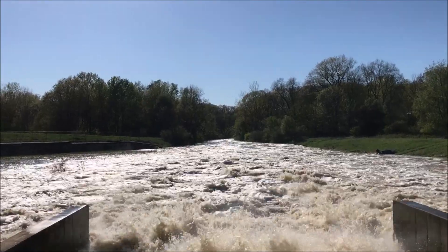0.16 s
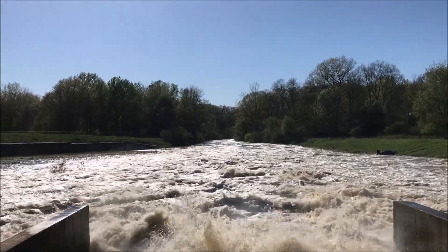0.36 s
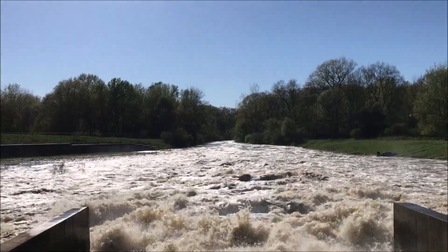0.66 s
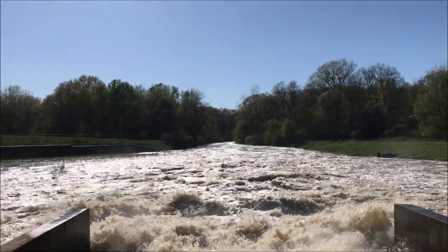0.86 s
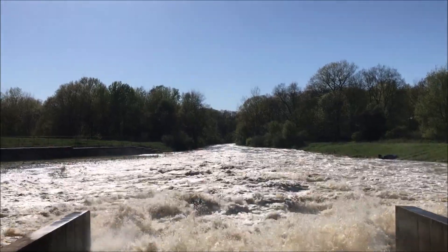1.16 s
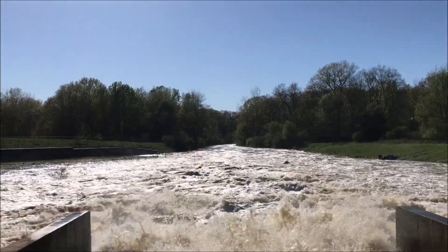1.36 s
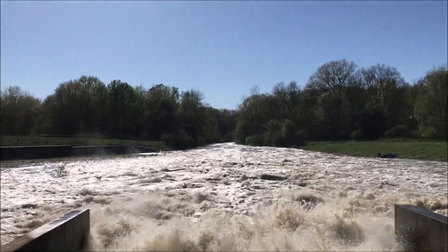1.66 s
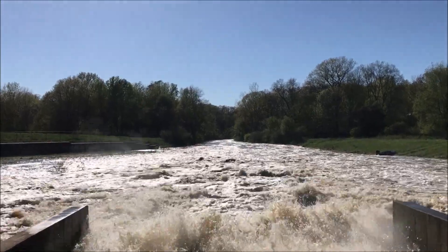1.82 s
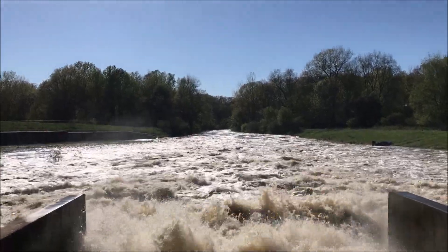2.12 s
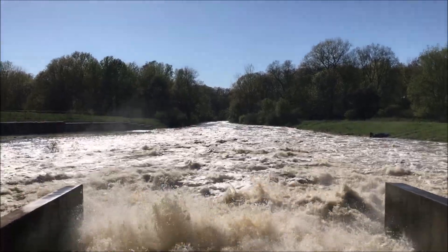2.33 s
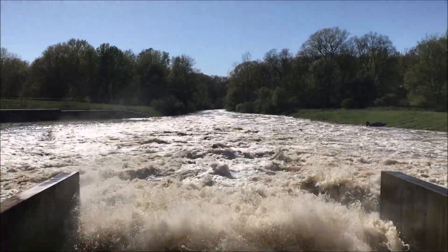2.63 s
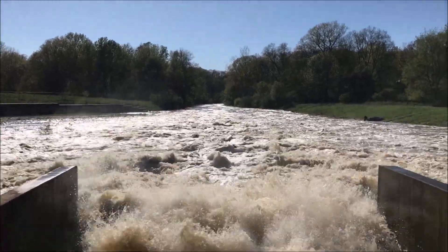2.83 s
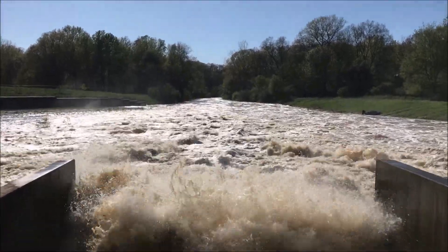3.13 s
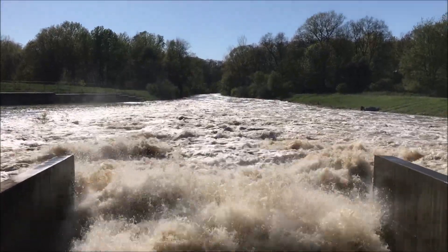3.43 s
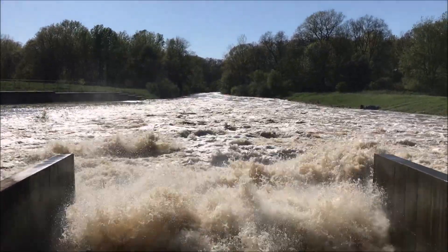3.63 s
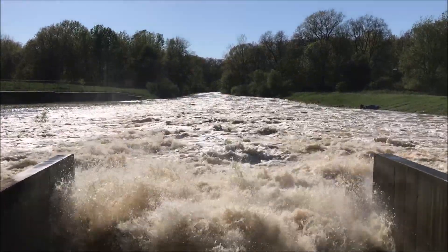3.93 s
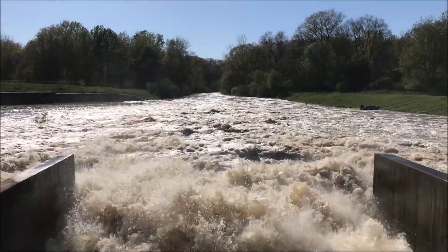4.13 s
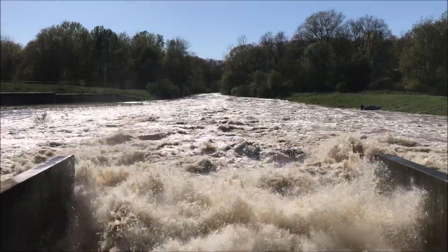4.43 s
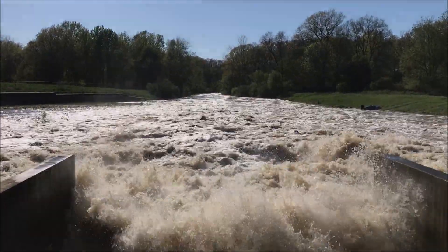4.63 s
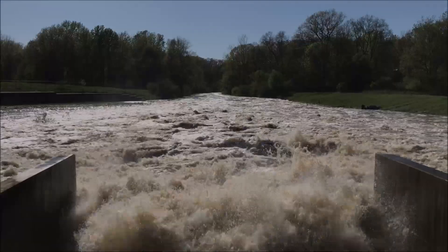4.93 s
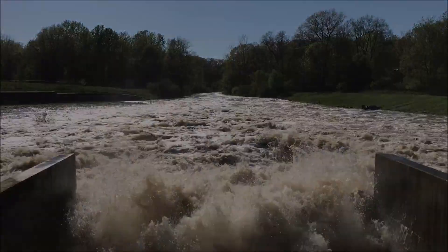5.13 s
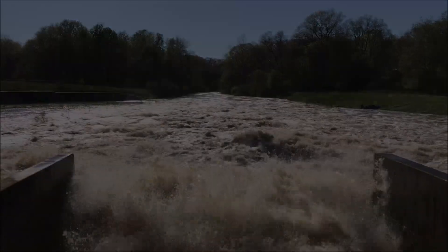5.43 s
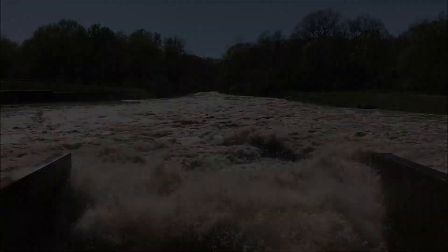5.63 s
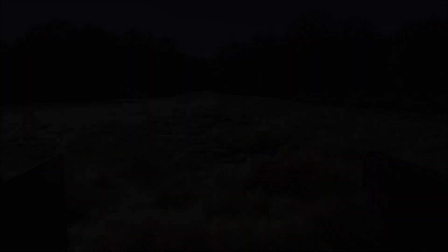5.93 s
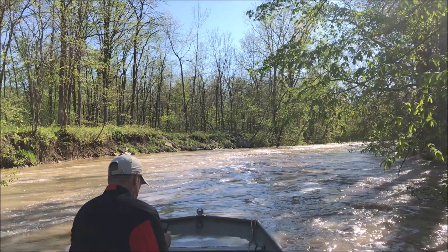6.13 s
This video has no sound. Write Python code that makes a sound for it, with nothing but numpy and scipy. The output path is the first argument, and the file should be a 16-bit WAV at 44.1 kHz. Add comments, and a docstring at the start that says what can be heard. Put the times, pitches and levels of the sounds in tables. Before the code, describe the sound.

Floodwater pours through a dam gate outdoors, heard fairly close from above in mono. A dense roar starts at full strength: deep rumble, boiling mid-low churn, broad froth and fine spray hiss, flickering unevenly. Low thuds of plunging water and a few quick wet slaps break through. From about one second the whole roar fades evenly to silence near six seconds, followed by a barely perceptible low river murmur.

```python
"""Floodwater from a dam gate

Floodwater plunges out of a dam gate between two walls and churns into white water, heard from above.
Trapped air rumbles, large bubbles boil, small ones froth and spray hisses: random clicks shaped by tone tables.
Heavy plunges and slaps of water add short, ringing tones from shut-in air.
The white water fades in small steps to silence, then a quiet river (clicks again) with a hum of steady tones
begins to fade in."""
import sys
import numpy as np
from scipy import signal
from scipy.fft import rfft, irfft
from scipy.io import wavfile

SR = 44100
rng = np.random.default_rng(int(sys.argv[2]) if len(sys.argv) > 2 else 0)


def log_audio(samples):
    """Write samples as a 16-bit WAV file to the path given in sys.argv[1]."""
    # one column per channel
    frames = np.atleast_2d(samples).T
    # limit to full scale, then quantise
    limited = np.clip(frames, -1, 1)
    pcm = np.round(limited * 32767).astype(np.int16)
    wavfile.write(sys.argv[1], SR, pcm)


N = 276507  # length [samples]

# Tone of each layer; only the shape counts, as each layer is brought to one loudness afterwards.
# Clouds of trapped air: (frequency [Hz], relative level [dB])
RUMBLE_TONE = [(13, -52), (22, -22), (33, -14), (44, -0.5), (64, 3), (104, -0.5), (145, -6), (200, -13.5),
               (260, -43.5), (440, -120)]
# Large bubbles: (frequency [Hz], relative level [dB])
BOIL_TONE = [(82, -29.5), (140, -3.5), (200, -2.5), (274, -2), (390, -4.5), (505, -8), (560, -11.5),
             (620, -17.5), (900, -59), (1500, -120)]
# Small bubbles: (frequency [Hz], relative level [dB])
FROTH_TONE = [(200, -69), (380, -31), (540, -9), (600, -4), (680, -2), (794, -4), (1250, -2), (1700, -4),
              (2050, -7.5), (2300, -14.5), (2600, -21), (3380, -42.5), (5720, -120)]
# Droplets, with the dips of the microphone housing: (frequency [Hz], relative level [dB])
SPRAY_TONE = [(1400, -27), (2400, -10), (2620, -4), (3090, 0.5), (3820, -2), (4440, 1), (5000, -4.5),
              (5900, -4.5), (7600, -15), (8300, -14.5), (9500, -16.5), (10500, -24.5), (11300, -24),
              (13300, -29), (16500, -28)]
# Surges about the steady levels: (time [s], rumble level [dB], boil level [dB], froth level [dB])
SURGES = [(0.0, 0.5, -2.5, 0.3), (0.2, -1.5, -1, 0), (0.33, -1, -1.5, 1), (0.44, -4, -1, 0),
          (0.52, 1, 3, 1.3), (0.62, -2.5, .5, -0.9), (0.75, -1, -2, 0.5), (0.95, 0, 0, .2), (1.1, 0, 0, 0),
          (1.27, -1, 2, 0), (1.4, -1.5, -2.5, -0.9), (1.47, -1, -0.5, 0), (1.5, -7, -2, -0.5),
          (1.55, -7, -3, 0), (1.58, 0, 1.5, 1), (1.63, 1, 1.5, -0.5), (1.68, -2, 1.5, .5),
          (1.8, -0.5, -2, -1), (1.95, -1, -1, -0.5), (2.06, -3, -0.5, 0.5), (2.2, 1.5, 0, -0.5),
          (2.35, 0, 0, 0.2), (2.65, -2.5, 1, 1), (2.8, -0.5, -3, 0), (2.92, -1, 0, -1), (3.08, -1, 0, -0.5),
          (3.3, -0.5, 0, 0), (3.43, -3.5, 1.5, 0), (3.6, -0.5, -1.5, 1.2), (3.85, -1, 2, -0.5),
          (4.02, 0, 1.5, 1), (4.11, 1.5, 0, -2), (4.2, -0.5, 1.5, 1), (4.3, -0.5, -1, -0.5),
          (4.5, 2, -1.5, -0.1), (4.65, -4, -0.5, 0.5), (4.8, 0.5, 1.5, 1), (4.95, 1, 0, 0),
          (5.2, 0, 1.5, 0), (5.5, -2, -1.5, -0.5), (5.72, 1, 2, 1.5), (5.86, 0, 2, 0.5), (6.0, 1, 0, 3.5)]
RUMBLE_DB, BOIL_DB, FROTH_DB, SPRAY_DB = -20.5, -23.5, -18.0, -28.5  # steady levels before the fade
SPRAY_FOLLOWS = 0.7  # share of the froth's surges [dB per dB] that the spray follows


def white_water():
    """Air clouds and bubbles of all sizes collapse; rumble and boil surge alone, froth and spray together."""
    rumble_surge_db, boil_surge_db, froth_surge_db = in_time(SURGES)
    rumble = churn(RUMBLE_TONE, 300, size_spread_db=2.0, heave_db=-0.1, patchy_db=0.16, patch_hz=7.1)
    boil = churn(BOIL_TONE, 1000, size_spread_db=2.2, heave_db=0.5, patchy_db=1.2, patch_hz=5.0)
    froth = churn(FROTH_TONE, 3000, size_spread_db=2.2, heave_db=0.5, patchy_db=1.0, patch_hz=5.0)
    spray = churn(SPRAY_TONE, 12000, size_spread_db=2, heave_db=0.4, patchy_db=0.5, patch_hz=12.0)

    water = from_db(RUMBLE_DB + rumble_surge_db) * rumble
    water += from_db(BOIL_DB + boil_surge_db) * boil
    water += from_db(FROTH_DB + froth_surge_db) * froth
    water += from_db(SPRAY_DB + SPRAY_FOLLOWS * froth_surge_db) * spray
    return water


def churn(tone, per_s, size_spread_db, heave_db, patchy_db, patch_hz):
    """Families of collapses ring a third of an octave apart; they heave together and flicker alone."""
    hz = np.maximum(np.fft.rfftfreq(N, 1 / SR), 1)
    tone_hz, tone_db = np.array(tone).T
    colour = from_db(np.interp(np.log(hz), np.log(tone_hz), tone_db))

    # pitch counted in thirds of an octave
    thirds = 3 * np.log2(hz)
    lowest = int(3 * np.log2(tone_hz[0]))
    highest = int(3 * np.log2(tone_hz[-1])) + 1

    heave = drift(14.0)
    out = np.zeros(N)
    for band in range(lowest, highest + 1):
        # neighbouring bands add up to even power
        share = np.cos(np.pi / 2 * np.clip(thirds - band, -1, 1))
        clicks = bursts(per_s, size_spread_db)
        family = irfft(rfft(clicks) * share * colour, N)
        flicker = drift(patch_hz)
        out += from_db(heave_db * heave + patchy_db * flicker) * family
    return rms_one(out)


def bursts(per_s, size_spread_db):
    """Each collapse is one click at a random moment, of random size and sign."""
    size_db = size_spread_db * np.minimum(rng.exponential(1, N), 5)
    clicks = from_db(size_db) * rng.choice([-1, 1], N)
    happens = rng.random(N) < per_s / SR
    return rms_one(clicks * happens)


def drift(corner_hz):
    """Slow random wandering of spread 1: noise smoothed twice by the same low-pass."""
    step = 40  # samples between the coarse points
    warm_up = 2000  # coarse points thrown away while the filter settles
    r = np.exp(-2 * np.pi * corner_hz * step / SR)
    noise = rng.standard_normal(N // step + warm_up + 2)
    slow = signal.lfilter([1], [1, -2 * r, r * r], noise)[warm_up:]
    return np.interp(np.arange(N) / step, np.arange(len(slow)), rms_one(slow))


FADE_END_S, FADE_LENGTH_S = 6.042, 4.91  # straight fall of the gain to zero
FADE_STEPS_PER_S = 30


def fade_out():
    """Gain of the white water: full at first, then a straight fall held in short steps."""
    step_s = np.floor(np.arange(N) / SR * FADE_STEPS_PER_S) / FADE_STEPS_PER_S
    return np.clip((FADE_END_S - step_s) / FADE_LENGTH_S, 0, 1)


# Heavy plunges of water: (time [s], level before rise and decay [dB], pitch [Hz])
HEAVY_PLUNGES = [(0.149, -4.5, 120.5), (0.05, -10, 60), (0.18, -4, 52), (0.5, -6, 60), (0.88, -5, 60),
                 (0.572, -4, 106), (1.12, -12, 75), (1.24, -9, 185.5), (1.255, -11, 75.5), (1.5, -5, 99),
                 (1.603, -2.5, 110), (1.61, -8.5, 169), (1.688, -6, 85), (1.81, -6, 60), (1.98, -4, 80),
                 (2.139, -5, 57), (2.416, -12, 75.4), (2.57, -8.5, 165), (2.76, -10.5, 100),
                 (2.82, -10, 60), (2.95, -8, 65), (3.19, -11, 110), (3.13, -14, 80), (3.27, -14, 85),
                 (3.33, -7, 65), (3.61, -7, 87), (3.72, -13, 70), (4.1, -9, 65), (4.79, -20, 70),
                 (5.0, -17, 95), (4.38, -13.5, 109), (5.099, -24.5, 95)]


def plunges():
    """Heavy water shuts in large pockets of air, which ring low."""
    return air_pockets(HEAVY_PLUNGES, rise_s=0.021, t60_s=0.15)


# Slaps of water on water: (time [s], level before rise and decay [dB], pitch [Hz])
WATER_SLAPS = [(0.308, -8, 1380), (1.168, -13, 910), (1.375, -6.5, 1160), (2.554, -15, 1100),
               (3.191, -12, 713), (3.203, -10, 740)]


def slaps():
    """Water slapping on water shuts in small pockets of air, which ring high and briefly."""
    return air_pockets(WATER_SLAPS, rise_s=0.0011, t60_s=0.03)


def air_pockets(rows, rise_s, t60_s):
    """A shut-in pocket of air swells quickly and rings at its pitch, its decay losing 60 dB in t60_s."""
    out = np.zeros(N)
    t = np.arange(N) / SR
    start_turns = rng.random(len(rows))  # starting point within one wave, 0 to 1
    for (start_s, level_db, hz), turn in zip(rows, start_turns):
        age = np.maximum(t - start_s, 0)
        rise = 1 - np.exp(-age / rise_s)
        decay = from_db(-60 * age / t60_s)
        out += from_db(level_db) * rise * decay * np.sin(2 * np.pi * (hz * age + turn))
    return out


# Tone of the quiet river, only the shape counts: (frequency [Hz], relative level [dB])
RIVER_TONE = [(20, -50.5), (45, -9.5), (82, -9), (114, -9), (185, -14), (230, -22), (330, -26), (480, -36),
              (690, -26), (1870, -26), (2750, -43), (4500, -46), (6500, -56), (12000, -65), (15600, -93),
              (22000, -120)]
# Steady low tones over the river: (frequency [Hz], peak level relative to the water's rms [dB])
HUM_TONES = [(84, 0), (115, 1), (182, -5)]
RIVER_START_S, RIVER_ONSET_S = 6.172, 0.005  # the onset softens the very start
RIVER_ENTRY_DB, RIVER_DB, RIVER_RISE_S = -69, -57.5, 0.11  # straight rise of the gain between two levels


def river():
    """Many small collapses make smooth far water, steady sine tones make the hum; both grow together."""
    age = np.arange(N) / SR - RIVER_START_S
    onset = np.clip(age / RIVER_ONSET_S, 0, 1)
    growth = np.interp(age, [0, RIVER_RISE_S], from_db([RIVER_ENTRY_DB, RIVER_DB]))
    water = churn(RIVER_TONE, 4000, size_spread_db=1.0, heave_db=0, patchy_db=0.7, patch_hz=12.0)
    hum = np.zeros(N)
    for hz, level_db in HUM_TONES:
        hum += from_db(level_db) * np.sin(2 * np.pi * (hz * age + rng.random()))
    return onset * growth * (water + hum)


def in_time(rows):
    """Each column of a table after the time, drawn as straight lines sample by sample."""
    times_s, *columns = np.transpose(rows)
    return [np.interp(np.arange(N) / SR, times_s, column) for column in columns]


def rms_one(x):
    """Scale a signal to an average strength (rms) of 1."""
    return x / np.sqrt(np.mean(x ** 2) + 1e-20)


def from_db(db):
    """Turn decibels into a gain."""
    return 10 ** (np.asarray(db) / 20)


def scene():
    """The white water fades out under the plunges and slaps, then the river sets in; one channel."""
    gate = fade_out() * white_water()
    blows = plunges() + slaps()
    return (gate + blows + river())[None]


def record(dry):
    """One microphone signal with the top treble cut by a steep low-pass at 15750 Hz."""
    low_pass = signal.ellip(12, 0.3, 80, 15750, fs=SR, output="sos")  # ripple 0.3 dB, cut 80 dB
    return signal.sosfilt(low_pass, dry)


dry = scene()
out = record(dry)
log_audio(out)
```